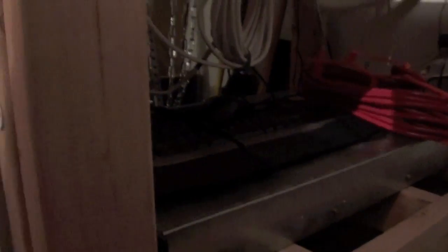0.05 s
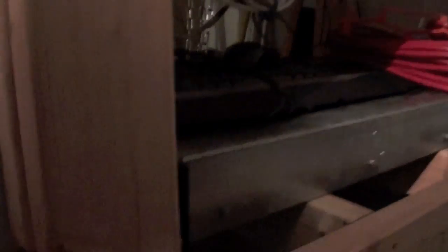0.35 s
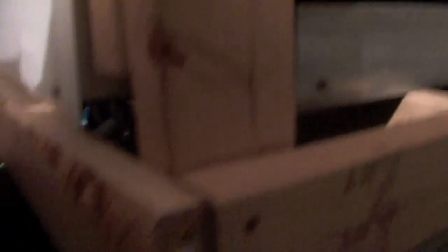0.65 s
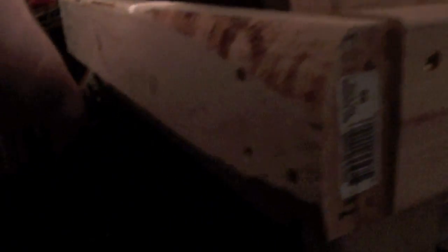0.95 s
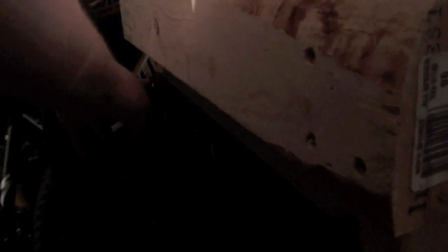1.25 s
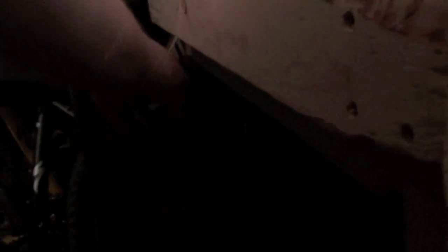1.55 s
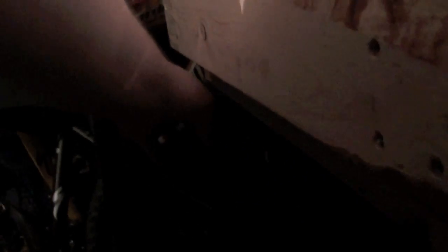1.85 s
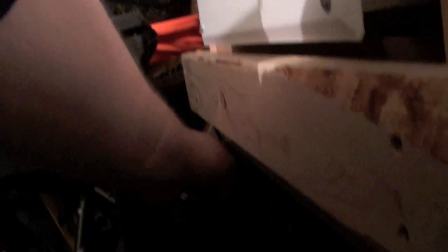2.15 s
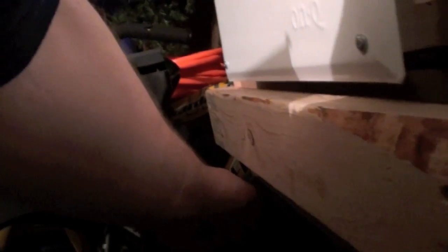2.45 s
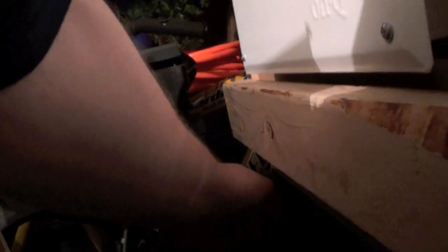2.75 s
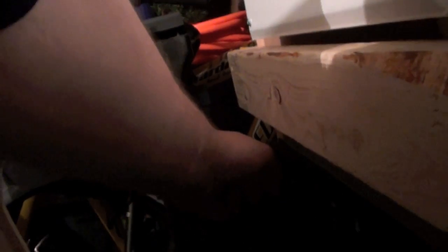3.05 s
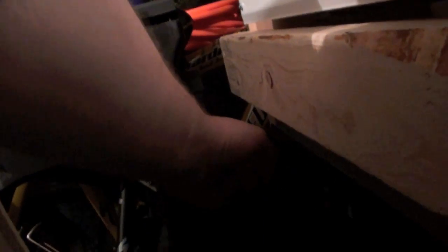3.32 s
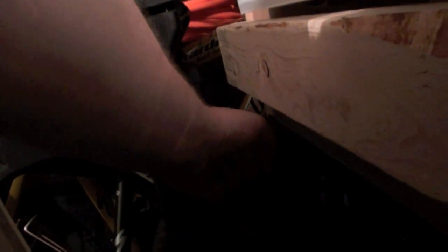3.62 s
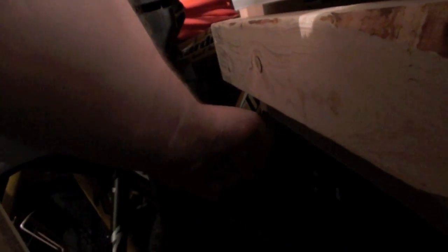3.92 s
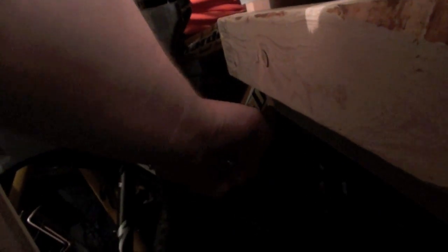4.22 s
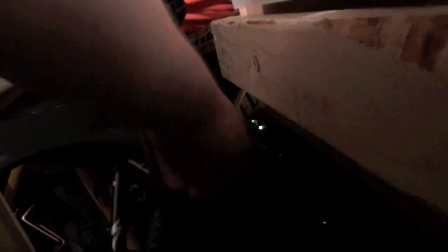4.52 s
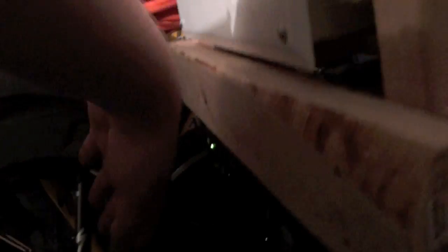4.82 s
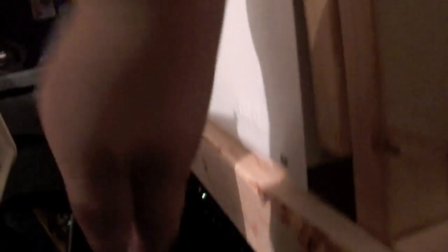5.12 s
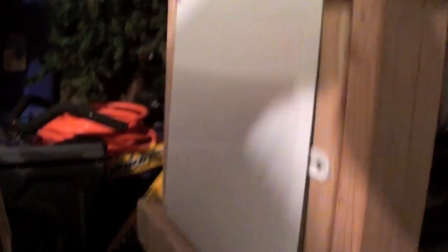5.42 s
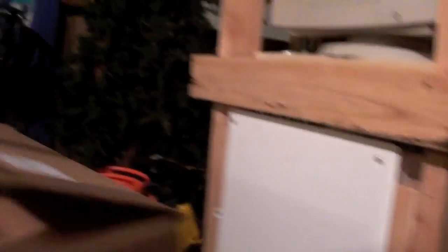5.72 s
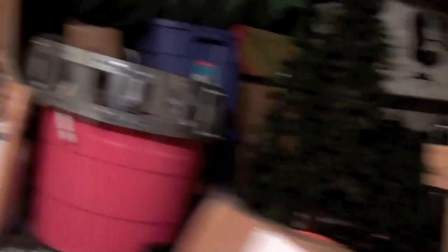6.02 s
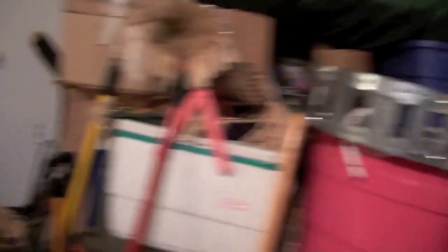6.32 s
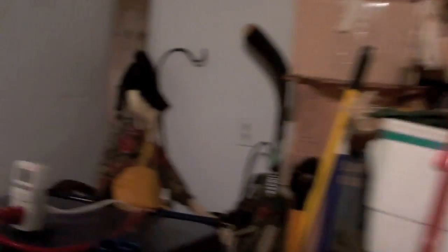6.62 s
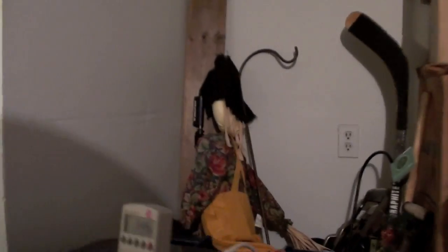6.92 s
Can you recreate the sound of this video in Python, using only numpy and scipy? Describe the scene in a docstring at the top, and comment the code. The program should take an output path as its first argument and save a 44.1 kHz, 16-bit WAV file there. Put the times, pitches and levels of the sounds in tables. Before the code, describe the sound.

In a quiet garage, someone shifts about close to a hand-held microphone, with faint rustling over a slight hum. A sharp switch click is followed by softer ones. With a small knock, a computer server powers on and its fans quickly wind up into a loud roar of air with a rising, then wavering whine. The roar dulls as the microphone turns away.

```python
"""A quiet garage, where a rack server is switched on close to a hand-held camera.
Over a faint hum, someone shifts about and clicks its switches; with a knock the bank of fans winds up.
The motors whirr, the rotors shake the rack, and eight blade tones beat against each other
in a roar of turbulent air, which dulls as the camera turns away."""
import sys
import numpy as np
from scipy import signal
from scipy.fft import rfft, irfft
from scipy.io import wavfile
from scipy.ndimage import uniform_filter1d

SR = 44100
rng = np.random.default_rng(int(sys.argv[2]) if len(sys.argv) > 2 else 0)


def wrap_up_sound(samples):
    """Save the sound to the file named by the first command line argument, as 16-bit audio."""
    columns = np.atleast_2d(samples).T
    # keep every value between -1 and 1, then stretch to whole-number steps
    tamed = np.clip(columns, -1, 1)
    steps = np.round(tamed * 32767).astype(np.int16)
    wavfile.write(sys.argv[1], SR, steps)


N = 315756
TIME = np.arange(N) / SR
BINS = np.fft.rfftfreq(2048, 1 / SR)
FRAMES = np.arange(N // 512 + 5) * 512 / SR


def amp(db):
    """Decibels to gain."""
    return 10 ** (np.asarray(db) / 20)


def unit(x):
    """Scales to rms 1."""
    return x / np.sqrt(np.mean(abs(x) ** 2) + 1e-20)


def automation(points):
    """Breakpoints joined by straight lines in time."""
    return np.interp(TIME, *np.transpose(points))


def eq(points, hz):
    """An EQ curve in dB, joined on a log-frequency axis."""
    f, db = np.transpose(points)
    return np.interp(np.log(hz + 1), np.log(f + 1), db)


def peaks(modes, hz):
    """Lift in dB from a set of resonances."""
    return sum(db / (1 + (2 * (hz - f) / width) ** 2) for f, width, db in modes)


def burst(start, length, db, attack, t60):
    """Envelope that rises, holds until start + length, and dies away; times in seconds."""
    t = TIME - start
    return np.clip(t / attack, 0, 1) * amp(db - 60 * np.maximum(t - length, 0) / t60)


def wander(rate_hz):
    """Smooth random modulation of rms 1, up to about the given rate."""
    hz = np.fft.rfftfreq(len(FRAMES), 512 / SR)
    slow = irfft(rfft(rng.standard_normal(len(FRAMES))) * np.exp(-(hz / rate_hz) ** 2), len(FRAMES))
    return unit(np.interp(TIME, FRAMES, slow))


def stereo_spectra(hz, shape, width):
    """Random spectra at two nearby microphones."""
    mid, side = rng.standard_normal((2, *shape)) + 1j * rng.standard_normal((2, *shape))
    side = side * amp(eq(width, hz))
    return np.array([mid + side, mid - side])


# narrow image of direct sound: f/Hz, side over mid/dB
NARROW = [(60, -20), (200, -23), (650, -18), (1600, -13.5), (3600, -14), (6500, -15.5), (9700, -25),
          (13000, -50)]
def noise(spectrum_db, width=NARROW):
    """Stereo noise of rms 1 with the given short-time spectrum."""
    spectra = stereo_spectra(BINS, (len(FRAMES), len(BINS)), width) * amp(spectrum_db)
    _, sound = signal.istft(spectra.swapaxes(1, 2), nperseg=2048, noverlap=1536)
    return unit(sound[:, :N])


def band_noise(spectrum_db, low_hz, high_hz):
    """Stereo noise that holds rms 1 inside the band while its colour moves."""
    power = amp(spectrum_db) ** 2
    share = power / power[:, (BINS > low_hz) & (BINS < high_hz)].sum(1, keepdims=True)
    return noise(10 * np.log10(share + 1e-20)) * np.sqrt(share.sum(1).mean())


# room tone: f/Hz, level/dB
ROOM_EQ = [(15, -45), (25, -27), (70, -2), (123, -4), (194, 0.5), (300, -2), (450, -2.5), (654, -5),
           (830, -3), (1010, -9), (1930, -12.5), (4950, -15), (8000, -15), (15800, -18.5)]
# its wide image: f/Hz, side over mid/dB
WIDE = [(60, -14), (270, -11), (650, -5), (1600, -1), (3600, -6), (6500, -13), (9700, -29), (13000, -45)]
# partials of the hum: f/Hz, level/dB
HUM = [(328.4, -63), (656.8, -71.5), (807.5, -75), (985.1, -75), (1314, -77.5), (2363, -79.5)]
def garage(air_db=-55.5, flutter_db=1.5):
    """The bed: still air and the hum of idle equipment."""
    hum = 0
    for hz, db in HUM:
        gain = amp(db + flutter_db * wander(3))
        hum += gain * np.sqrt(2) * np.sin(2 * np.pi * hz * TIME + .17 * wander(2))
    return amp(air_db) * noise(eq(ROOM_EQ, BINS), WIDE) + hum


# handling bumps: t/s, length/s, level/dB
GRIPS = [(.14, .07, -67), (5.82, .16, -52), (5.997, 0.12, -46.5)]
def camera(frame_hz=29.97, first_tick_s=.0182):
    """The electronics tick once a frame; the hand rumbles on the housing."""
    since = (TIME - first_tick_s) % (1 / frame_hz)
    ticks = amp(-53.5) * np.exp(-since / .0016) * np.sin(2 * np.pi * 5080 * since)
    housing_eq = [(20, -14), (45, -11), (85, -1), (140, -11), (260, -10), (600, -43), (3000, -80)]
    handling = sum(burst(*grip, attack=.07, t60=.11) for grip in GRIPS)
    return ticks + handling * noise(eq(housing_eq, BINS))


# faint squeaks: t/s, length/s, start f/Hz, end f/Hz, level/dB
SQUEAKS = [(2.126, .095, 7300, 8800, -62), (2.26, .075, 8250, 8850, -67), (2.31, .05, 8550, 8300, -67),
           (2.4, .06, 8650, 8300, -68), (2.68, .09, 7200, 8200, -68)]
def squeaks(waver=.004):
    """Each squeak is a thin, slightly unsteady glide that fades in and out."""
    out, unsteady = np.zeros(N), 1 + waver * wander(40)
    for start, length, first_hz, last_hz, db in SQUEAKS:
        progress = np.clip((TIME - start) / length, 0, 1)
        cycles = np.cumsum((first_hz + (last_hz - first_hz) * progress) * unsteady) / SR
        out += amp(db) * np.sin(np.pi * progress) * np.sin(2 * np.pi * cycles)
    return out


# moves of clothes and feet: t/s, length/s, level/dB
RUSTLES = [(-.05, 0.25, -47), (0.367, 0.13, -50.5), (0.558, .12, -51.5), (.75, 0.31, -55),
           (2.25, 0.15, -57.5), (2.673, 0.26, -62.5)]
# tone of the rubbing: f/Hz, level/dB
CLOTH_EQ = [(29, -42), (50, -18), (220, -3.5), (322, -1), (408, -8), (483, -0.5), (613, -10.5), (816, -5),
            (1250, -11), (6820, -14), (15000, -29)]
# image of close foley: f/Hz, side over mid/dB
CLOSE = [(60, -20), (270, -15), (650, -10), (1600, -9), (3600, -10), (6500, -12), (9700, -19), (13000, -45)]
def rustling(rub_db=-49.5, fade_db_per_s=8):
    """Cloth and soles rub in uneven little surges over a faint, fading friction."""
    rub = amp(rub_db - fade_db_per_s * TIME)
    surges = [burst(*rustle, attack=.032, t60=1.65) for rustle in RUSTLES]
    return np.max([rub] + surges, axis=0) * amp(wander(25)) * noise(eq(CLOTH_EQ, BINS), CLOSE)


# tone of the loose part: f/Hz, level/dB
RATTLE_EQ = [(40, -30), (130, 1.5), (260, 2), (390, -11), (680, 6), (900, -16), (1100, -5.5), (2200, -5),
             (3300, -26), (6000, -21.5), (9000, -38), (15000, -45)]
# its resonances: f/Hz, width/Hz, boost/dB
RATTLE_MODES = [(2500, 250, 10), (4080, 140, 10), (4980, 220, 23), (5950, 330, 20)]
def rattle():
    """Something loose is bumped and chatters briefly."""
    chatter = burst(start=.13, length=.065, db=-44.5, attack=.009, t60=.2) * amp(2.6 * wander(60))
    return chatter * noise(eq(RATTLE_EQ, BINS) + peaks(RATTLE_MODES, BINS), CLOSE)


def thud(start=.144, hz=150, db=-38, swell_s=.0028):
    """A soft bump on the wooden frame: one low push that dies within a few cycles."""
    t = np.clip(TIME - start, 0, 1)
    push = amp(db) * t / swell_s * np.exp(1 - t / swell_s)
    return push * (np.sin(2 * np.pi * hz * t) + .5 * np.sin(2 * np.pi * 1.4 * hz * t))


def hits(cues, tone, modes, low_stretch=5.2, crossover_hz=2200, room_t60=.14, room_tilt_db=-2):
    """Each contact is a short dense ring of the panel, followed by the duller tail of the garage."""
    size = SR // 3
    t, hz = np.arange(size) / SR, np.fft.rfftfreq(size, 1 / SR)
    octaves = np.log2(np.maximum(hz, 300) / 4000)
    lowpass = signal.butter(4, crossover_hz, fs=SR, output="sos")
    out = np.zeros((2, N + size))
    for start, db, attack, t60, tilt_db, send_db in cues:
        body_db = eq(tone, hz) + peaks(modes, hz) + tilt_db * octaves
        body, room = (unit(irfft(stereo_spectra(hz, hz.shape, NARROW) * amp(spectrum_db), size))
                      for spectrum_db in (body_db, body_db + room_tilt_db * octaves))
        lows = signal.sosfiltfilt(lowpass, body)
        fall_db = -60 * np.maximum(t - attack, 0) / t60
        # the low modes ring low_stretch times as long as the high ones
        ring = (body - lows) * amp(fall_db) + lows * amp(fall_db / low_stretch) / np.sqrt(low_stretch)
        tail = room * (1 - np.exp(-t / .0016)) * amp(send_db - 4 - 60 * t / room_t60)
        out[:, round(start * SR):][:, :size] += amp(db) * (np.minimum(t / attack, 1) * ring + tail)
    return out[:, :N]


# light metal contacts: t/s, level/dB, attack/s, t60/s, tilt/dB per octave, room send/dB
TINKS = [(1.247, -50, .003, .06, -10, -9), (1.283, -48, .018, 0.12, 3, -9),
         (1.3905, -44.5, .002, .045, 0, -9), (4.5255, -36, .0013, .06, -3, -7)]
# tone of the metal: f/Hz, level/dB
TINK_EQ = [(300, -23), (900, -18), (2400, -1), (3400, -13), (4500, -4), (6200, -3), (7500, -6), (9000, -20),
           (15000, -35)]
# its resonances: f/Hz, width/Hz, boost/dB
TINK_MODES = [(2100, 120, 5), (6180, 230, 11)]
def tinks():
    """Thin metal gives a damped ring."""
    return hits(TINKS, TINK_EQ, TINK_MODES)


# switch clicks: t/s, level/dB, attack/s, t60/s, tilt/dB per octave, room send/dB
CLICKS = [(1.929, -50.5, .001, 0.037, -2, -7), (2.5432, -20.5, 0.0015, 0.036, 2.5, -11),
          (2.905, -52, .003, .08, -7, -2), (3.4845, -36, 0.0048, 0.038, -1, -4.5),
          (4.2615, -42, 0.0013, 0.04, -5, 3), (6.727, -30, .003, 0.24, -0.5, -9),
          (6.915, -38, .002, 0.05, 5, -7)]
# tone of plastic and metal: f/Hz, level/dB
CLICK_EQ = [(290, -50), (500, -11), (621, -16), (853, -21), (1240, -9.5), (1570, -13.5), (2250, -10),
            (2350, -14.5), (3470, -8), (5830, -10), (7350, -0.5), (12700, -24), (15800, -33)]
# button and front panel resonances: f/Hz, width/Hz, boost/dB
PANEL_MODES = [(1466, 47, 9.5), (1620, 100, 14), (3460, 140, 6), (4030, 140, 7), (4640, 150, 4),
               (5420, 220, 6), (6600, 250, 5), (7700, 130, 4), (8650, 250, -6), (10300, 390, 5),
               (12500, 350, 7)]
def switches():
    """Each click sets the button and front panel ringing."""
    return hits(CLICKS, CLICK_EQ, PANEL_MODES)


# double hit at power-on: t/s, level/dB, attack/s, t60/s, tilt/dB per octave, room send/dB
KNOCKS = [(4.328, -46, 0.0023, 0.054, 2, -7), (4.3465, -34, 0.00084, 0.15, -0.5, -7)]
# tone of the knock: f/Hz, level/dB
KNOCK_EQ = [(150, -43), (250, -12), (740, -7.5), (991, -26), (1160, 0.5), (1530, -8), (1660, 1),
            (2410, -19), (2750, -15), (3340, -19), (12000, -36), (15600, -70), (22000, -120)]
# its resonances: f/Hz, width/Hz, boost/dB
KNOCK_MODES = [(732, 60, 12), (1190, 90, 4), (1680, 100, 0.5), (1850, 80, 6), (2400, 100, 17)]
def knock():
    """A midrange knock with a tight low end as the power comes on."""
    return hits(KNOCKS, KNOCK_EQ, KNOCK_MODES, low_stretch=.86)


# the camera's turn: t/s, turn (0 facing the server, 1 facing away)
TURN = [(4.95, 0), (5.25, 0.17), (5.7, 0.37), (6.0, 0.64), (6.17, 0.87), (6.8, 0.88), (7.1, 1)]
def turning(sound, widen_db=3.5, lean_db=-1.0, away_lean_db=-1.5):
    """Facing away, the camera hears more of the walls, and the body of the sound leans further right."""
    mid, side = (sound[0] + sound[1]) / 2, (sound[0] - sound[1]) / 2
    away = automation(TURN) ** 2
    body = signal.sosfiltfilt(signal.butter(1, 3500, fs=SR, output="sos"), mid)
    pan = amp((lean_db + away_lean_db * away) / 2) - 1
    side = side * amp(widen_db * away) + body * pan
    return np.array([mid + side, mid - side])


BLADE_HZ, BLADES_PER_FAN = 709, 7  # blade-passing rate at full speed; blades on a rotor
def speed(t, rest_s=4.243, run_up_s=.588):
    """Share of full fan speed: steady motor torque against air drag that grows with its square."""
    return np.tanh(np.maximum(t - rest_s, .01) / run_up_s)


def fan_gain(db, db_per_decade, away_db, power_on_s=4.345):
    """A fan layer opens at power-on, grows as a power of speed and shifts by away_db with the turn."""
    gate = np.clip((TIME - power_on_s) / .023, 0, 1)
    return gate * amp(db + db_per_decade * np.log10(speed(TIME)) + away_db * automation(TURN))


def shaft():
    """The unbalanced rotors shake the rack once a turn; the hum booms for a moment in the room."""
    turns = np.cumsum(BLADE_HZ * speed(TIME) / BLADES_PER_FAN * (1 + .012 * wander(6))) / SR
    boom = 1 + burst(start=6.5, length=.31, db=11, attack=.073, t60=.9)
    gain = fan_gain(-64, db_per_decade=90, away_db=-6) * boom * amp(1.8 * wander(7.9))
    return gain * np.sqrt(2) * np.sin(2 * np.pi * turns)


# tone of the motor whirr: f/Hz, level/dB
WHIRR_EQ = [(300, -25), (1000, -4), (1500, 0.5), (2600, -7), (3100, -20), (7500, -17), (12000, -35)]
# its resonances: f/Hz, width/Hz, boost/dB
WHIRR_MODES = [(1580, 90, 8.3), (2460, 130, 6), (3780, 130, 8)]
def motors(pulses_per_turn=4, depth=.65):
    """Straining from rest under their starting current, the motors buzz in the case."""
    turns = np.cumsum(BLADE_HZ * speed(TIME) / BLADES_PER_FAN) / SR
    pulses = 1 + depth * np.cos(2 * np.pi * pulses_per_turn * turns)
    strain = burst(start=4.35, length=.18, db=-46, attack=.086, t60=.7)
    return strain * pulses * noise(eq(WHIRR_EQ, BINS) + peaks(WHIRR_MODES, BINS))


# airflow while winding up: f/Hz, level/dB
SLOW_AIR_EQ = [(35, -64), (60, -36), (141, -3.5), (269, -4.5), (364, 0), (875, -8.5), (982, -9.5),
               (1080, -18), (1330, -4.5), (1450, -25), (1600, -2.5), (1920, -18), (4210, -23.5),
               (5950, -23), (15000, -43)]
# airflow at full speed: f/Hz, level/dB
FAST_AIR_EQ = [(15, -55), (35, -33), (60, -36), (110, -16.5), (160, -13.5), (220, -4.5), (350, -6.5),
               (480, 1.5), (750, 2.5), (1300, -5.5), (2200, -9), (5200, -13), (7300, -10.5), (8400, -17.5),
               (9600, -28.5), (15500, -42.5)]
# chassis resonances: f/Hz, width/Hz, boost/dB
CHASSIS_MODES = [(200, 27, 1.5), (264, 52, 5.5), (425.3, 19, 6.5), (1032, 20, 2), (1162, 62, 4),
                 (1300, 70, 3.5), (1620, 130, 2.5), (2080, 160, 3), (2770, 52, -0.5), (3500, 78, 1.5),
                 (3700, 130, 2), (4100, 140, 4), (4400, 69, 4), (4950, 160, 3), (6700, 440, 1)]
def airflow(patch_db=.95, ripple_db=1.63):
    """Turbulence brightens with speed and rings the chassis; wall echoes ripple it as the camera moves."""
    morph = np.clip((BLADE_HZ * speed(FRAMES) - 330) / 220, 0, 1)[:, None]
    patches, ripple = rng.standard_normal((2, len(FRAMES), len(BINS)))
    patches = unit(uniform_filter1d(uniform_filter1d(patches, 5, axis=0), 16, axis=1))  # quick, broad
    ripple = unit(uniform_filter1d(uniform_filter1d(ripple, 50, axis=0), 3, axis=1))  # slow, narrow
    air_db = (1 - morph) * eq(SLOW_AIR_EQ, BINS) + morph * eq(FAST_AIR_EQ, BINS)
    air_db += peaks(CHASSIS_MODES, BINS) + patch_db * patches + ripple_db * ripple

    def band(share, low_hz, high_hz):
        return band_noise(air_db + 10 * np.log10(share + 1e-12), low_hz, high_hz)

    lows = 1 / (1 + (BINS / 520) ** 8)
    highs = 1 / (1 + (3500 / (BINS + 1)) ** 8)
    mids = np.maximum(1 - lows - highs, 0)
    # low rush, roar and hiss leave the case in ever narrower beams, so each has its own level
    roar = fan_gain(-20, db_per_decade=53, away_db=-8) * band(mids, 800, 3000)
    hiss = fan_gain(-25.5, db_per_decade=86, away_db=-13.5) * band(highs, 4000, 9000)
    rush = fan_gain(-30, db_per_decade=36, away_db=-6) * band(lows, 150, 450)
    return rush + roar + hiss


# slow swell of the blade tone as the fans drift in and out of step: t/s, level/dB
SWELL = [(4.42, -22), (4.58, -4), (4.68, -7.5), (4.76, -4.5), (5.05, 5.5), (5.11, -7), (5.24, 3),
         (5.39, 2.5), (5.5, -6.0), (5.58, 1.5), (5.67, -9.5), (5.75, 0), (5.93, -13.5), (6.05, -15.5),
         (6.22, -1.5), (6.29, -1), (6.34, -10.5), (6.42, -5.5), (6.47, -17.5), (6.58, -7), (6.62, -12.5),
         (6.78, -12.5), (6.94, -4.5), (7.0, -7), (7.15, -3)]
# overtones that make the whine: harmonic number, level/dB
OVERTONES = [(2, -8), (3, -18), (4, -16), (5, -22), (6, -21)]
# how strongly the case lets an overtone out as it sweeps past: f/Hz, level/dB
OUTLET_EQ = [(300, 0), (450, -21), (650, 5.5), (850, -7), (980, -29), (1230, -8), (1380, 3.5), (1440, -3),
             (1520, -3), (1680, 3), (1800, 5), (2200, -4.5), (2800, -9), (3100, -20)]
def blades(fans=8, detune=.013, drift=.003495):
    """Fans at slightly unequal speeds: their blade tones swell and cancel."""
    blade_hz = BLADE_HZ * speed(TIME)
    pitches = [blade_hz * (1 + detune * offset + drift * wander(9.18))
               for offset in np.linspace(-1, 1, fans)]
    rotors = np.exp(2j * np.pi * np.cumsum(pitches, axis=1) / SR)
    # each fan reaches the two microphones by its own path
    stereo_phase = .11 * np.array([[1], [-1]]) * unit(rng.standard_normal(fans))
    paths = np.exp(2j * np.pi * rng.random(fans) + 1j * stereo_phase)
    bank = paths @ rotors
    # level the bank, keeping its quick beats; SWELL rides the slow ones
    slow_rms = np.sqrt(uniform_filter1d((abs(bank) ** 2).mean(0), size=4600) + .00093)
    tone_gain = fan_gain(-16, db_per_decade=60, away_db=0) * amp(automation(SWELL))
    out = tone_gain * np.sqrt(2) * bank.real / slow_rms
    whine_gain = fan_gain(-18.5, db_per_decade=49, away_db=-9.5)
    for harmonic, db in OVERTONES:
        overtone = unit((paths @ rotors ** harmonic).real)
        out += whine_gain * amp(db + eq(OUTLET_EQ, harmonic * blade_hz)) * overtone
    return out


def scene():
    """The mix: the server's image follows the turn; room tone and foley stay put."""
    contacts = switches() + knock() + tinks()
    server = contacts + motors() + airflow() + blades() + shaft()
    return turning(server) + garage() + rustling() + rattle() + squeaks() + thud() + camera()


def record(dry, cutoff_hz=15800):
    """The camera's band limit: a steep high cut."""
    high_cut = signal.firwin(511, cutoff_hz, window=("kaiser", 9), fs=SR)
    return signal.oaconvolve(dry, high_cut[None], "same")


dry = scene()
out = record(dry)
wrap_up_sound(out)
```